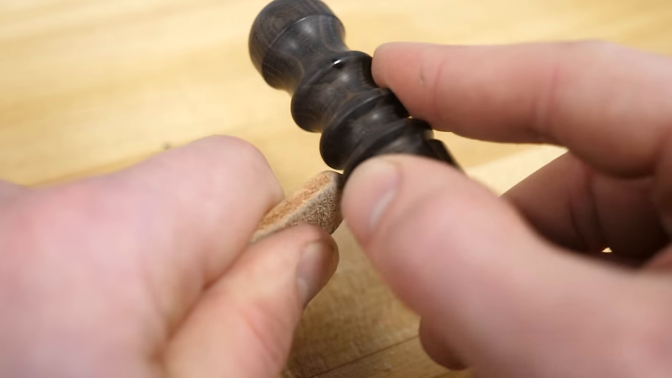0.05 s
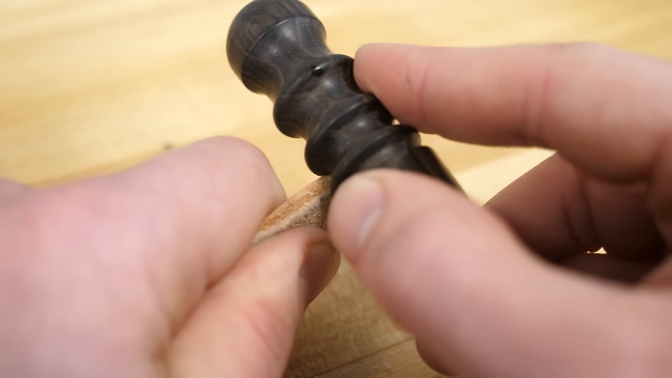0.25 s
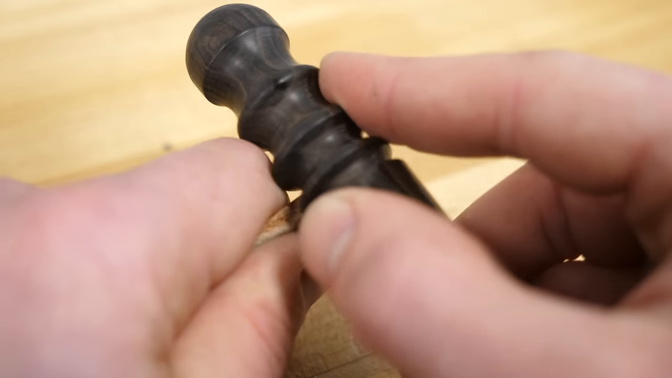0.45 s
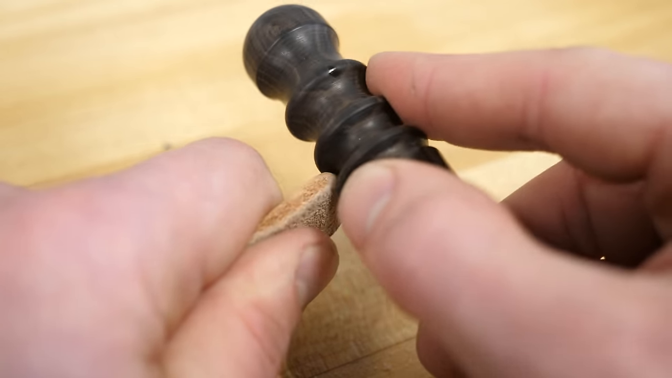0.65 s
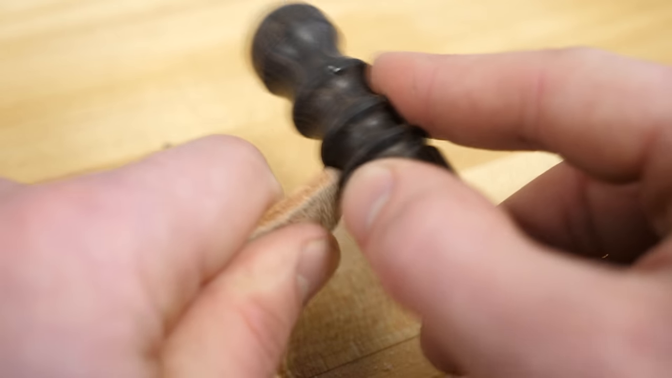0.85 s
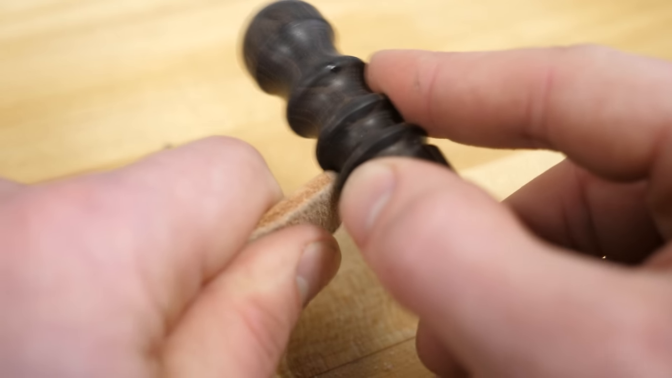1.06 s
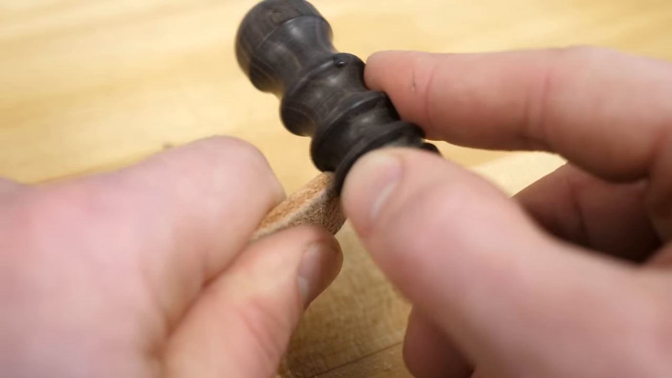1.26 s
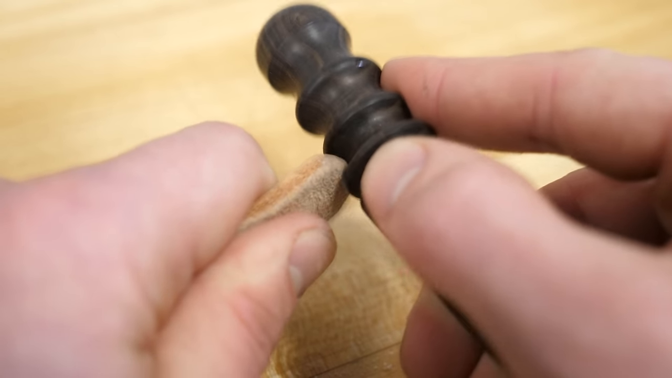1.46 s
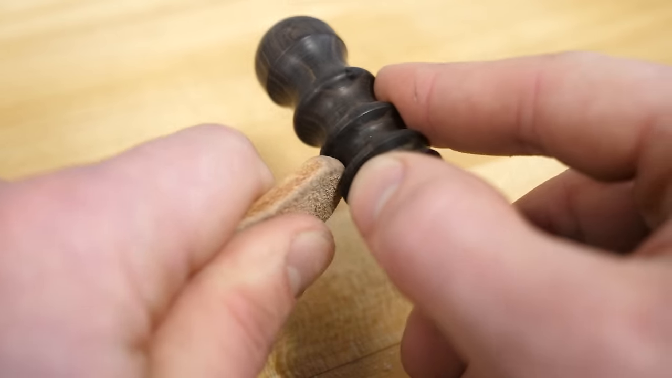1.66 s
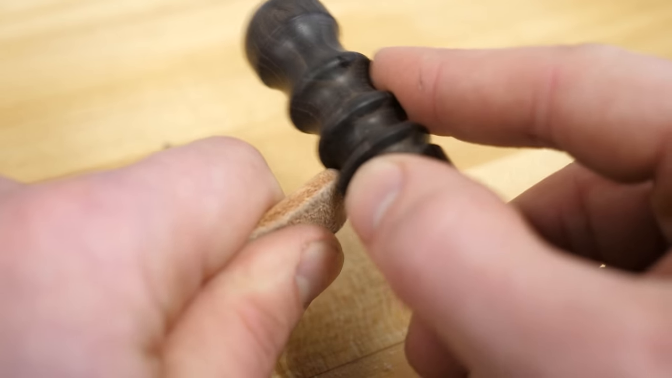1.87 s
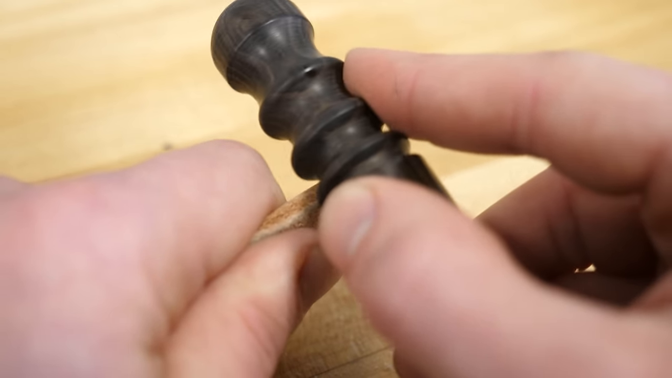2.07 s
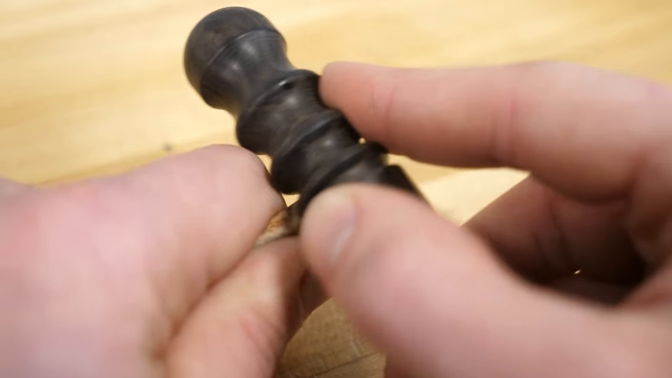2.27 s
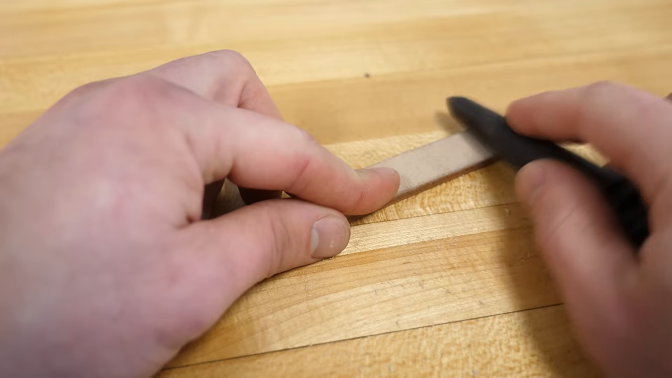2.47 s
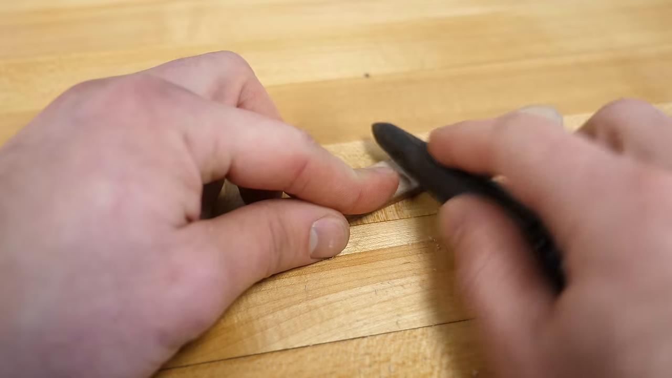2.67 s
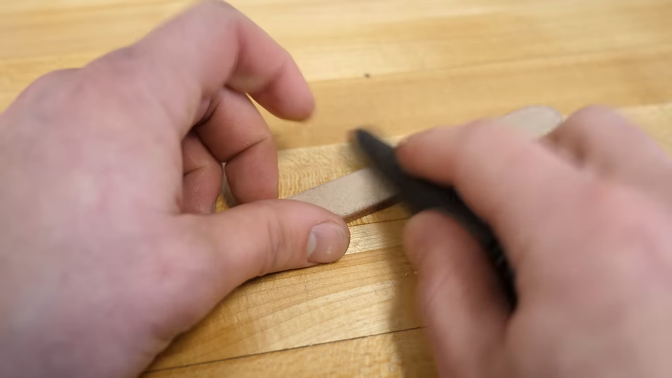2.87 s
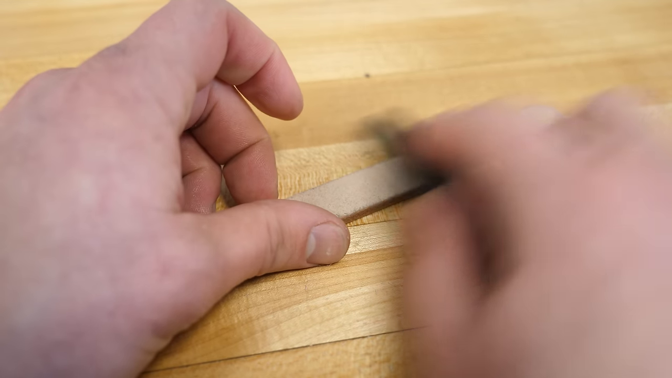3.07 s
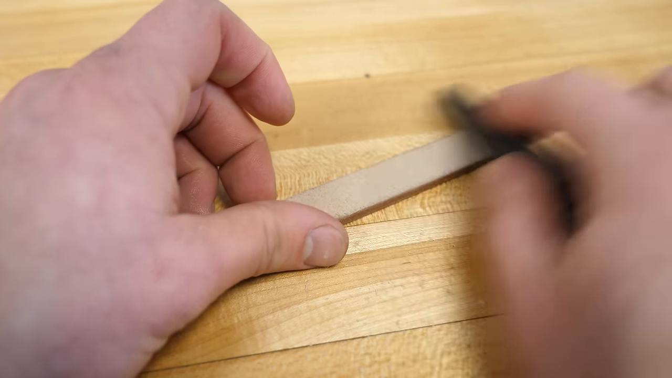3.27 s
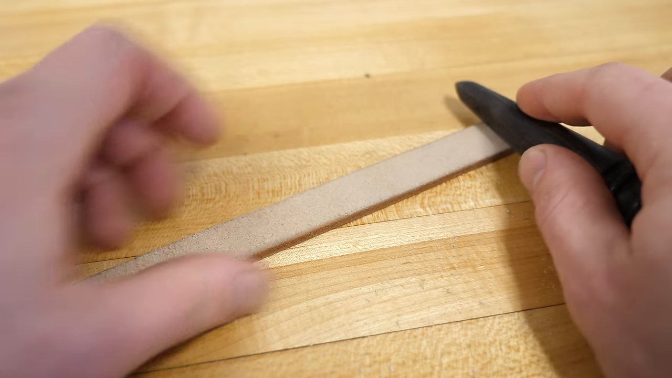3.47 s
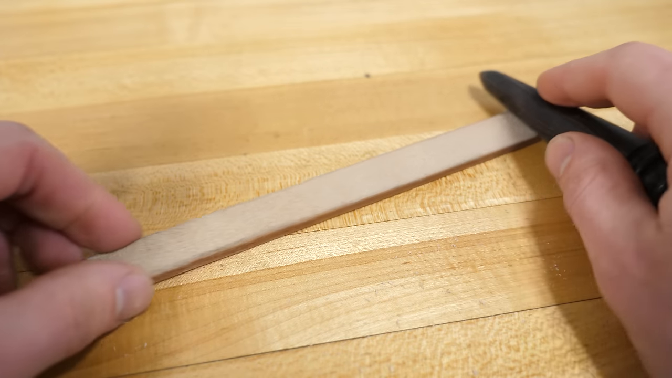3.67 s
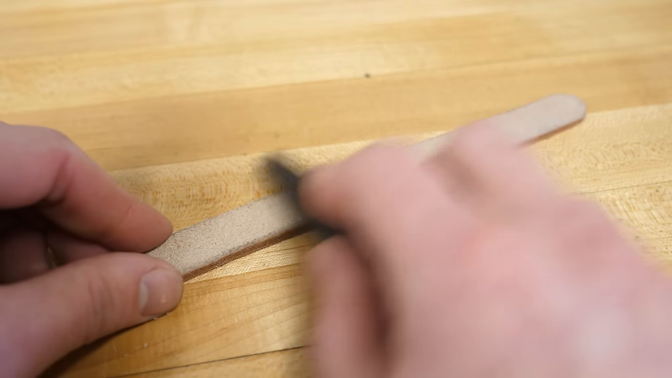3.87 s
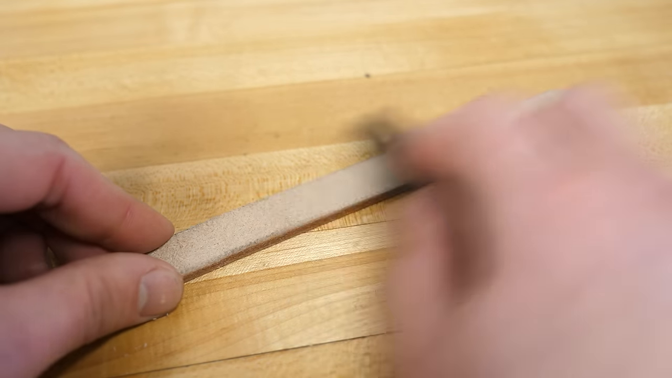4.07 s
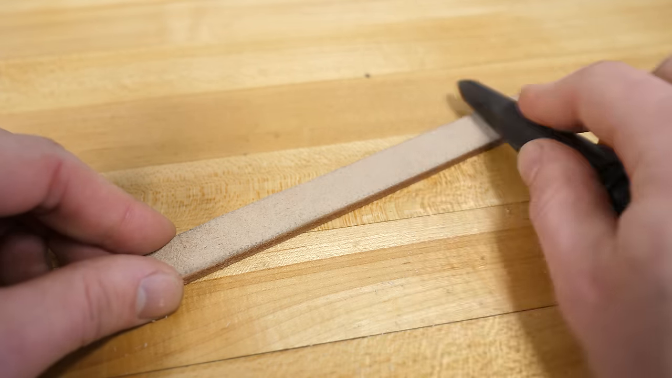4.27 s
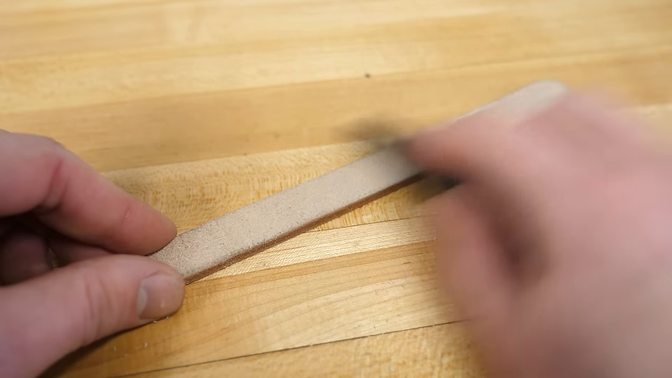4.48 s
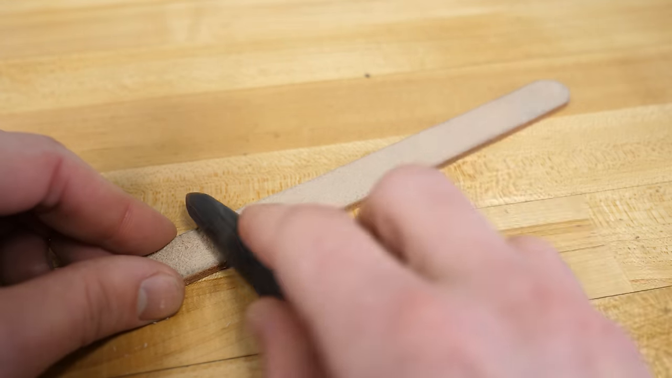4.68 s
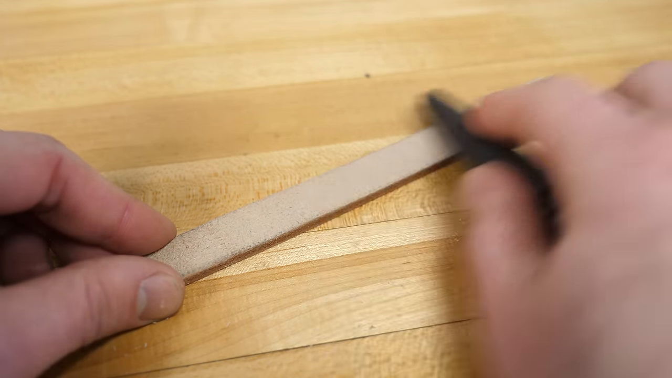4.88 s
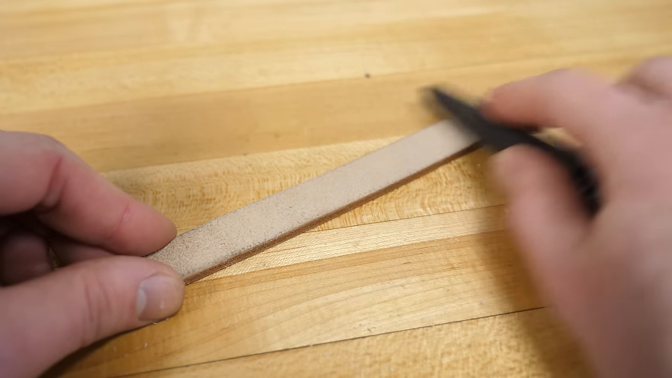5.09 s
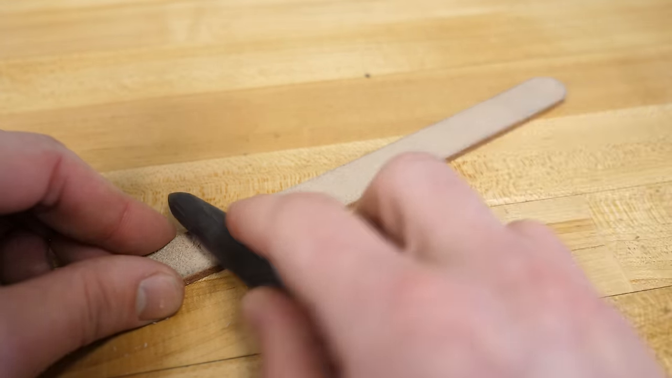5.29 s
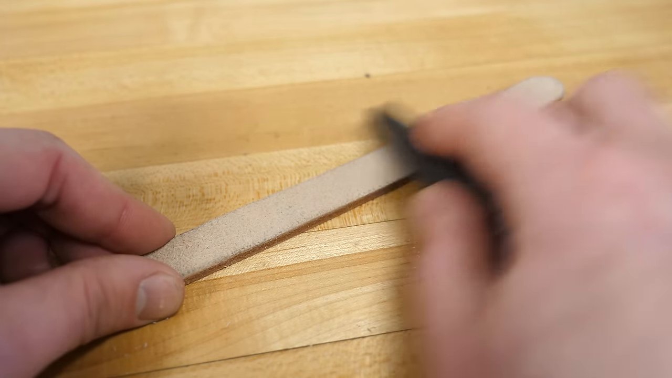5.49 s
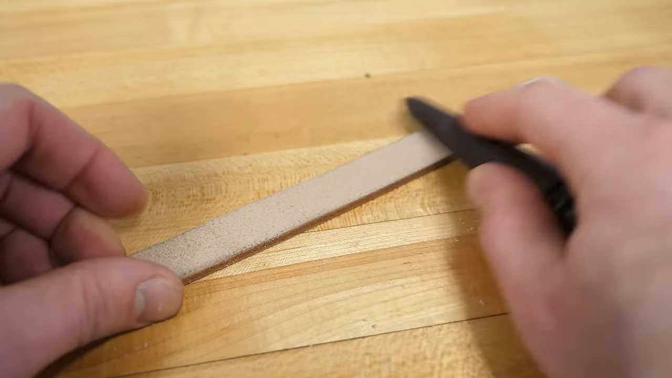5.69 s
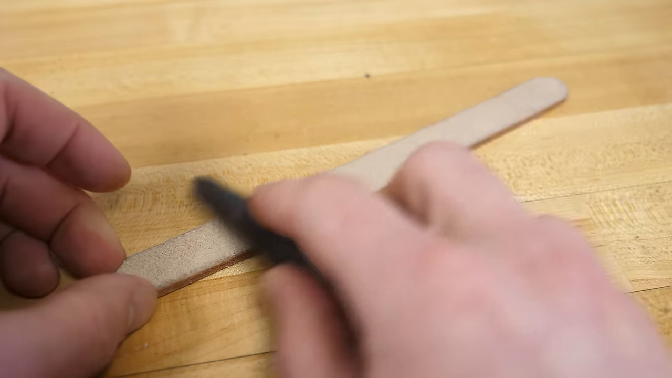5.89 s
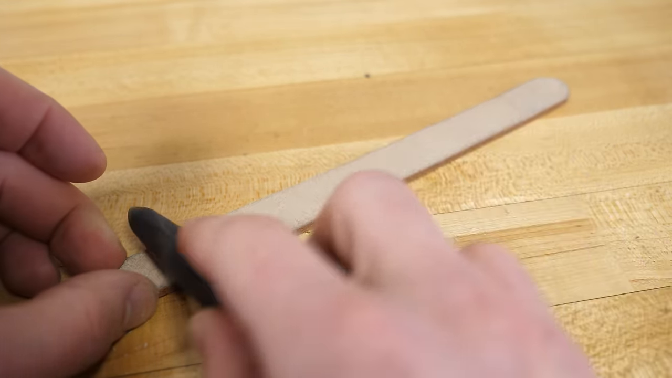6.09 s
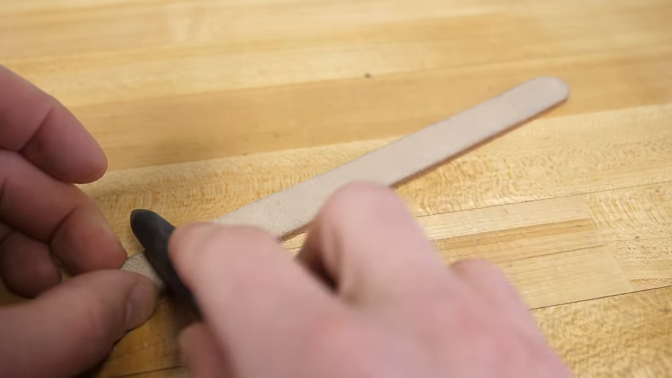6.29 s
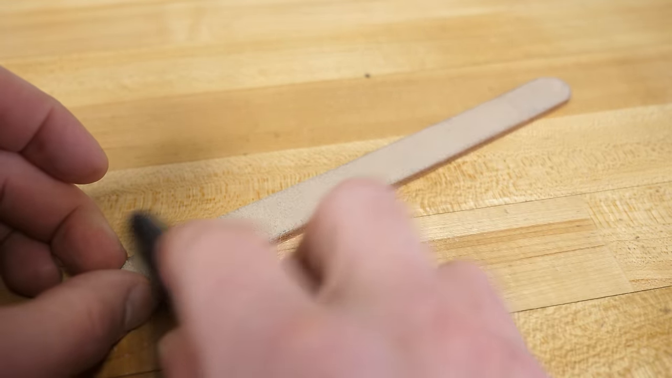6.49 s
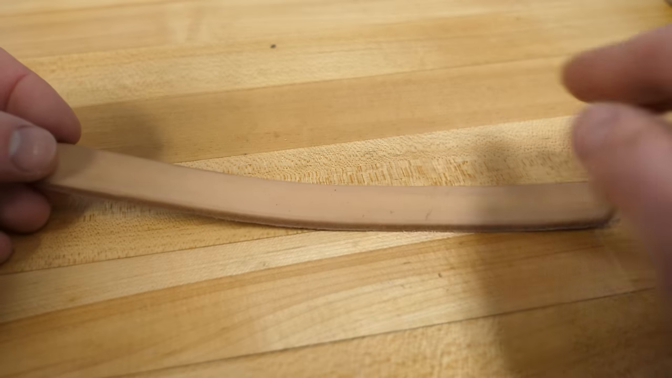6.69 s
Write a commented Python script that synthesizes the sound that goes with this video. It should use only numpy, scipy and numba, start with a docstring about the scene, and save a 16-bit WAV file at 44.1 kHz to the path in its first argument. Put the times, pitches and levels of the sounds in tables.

```python
"""A grooved wooden burnisher is rubbed to and fro on a leather strap, heard close by in a quiet room.
At first the strap's edge is held up in the hand: short bright hisses of noise and resonances.
From 2.37 s the strap lies on a wooden bench, whose boards hum along as resonances of the same friction.
Edge ticks ring the tool, the hands jolt the bench as damped wobbles, fingers slide with coloured noise.
A last tap is chopped at 6.5775 s; a finger slide and the room tone, with its faint hum, remain."""
import sys
import numpy as np
from scipy import signal
from scipy.fft import rfft, irfft, next_fast_len
from scipy.io import wavfile
from scipy.ndimage import uniform_filter1d
from numba import njit

SR = 44100
rng = np.random.default_rng(int(sys.argv[2]) if len(sys.argv) > 2 else 0)


def log_audio(samples):
    """Write samples as a 16-bit WAV file to the path given in sys.argv[1]."""
    # one column per channel
    frames = np.atleast_2d(samples).T
    # limit to full scale, then quantise
    limited = np.clip(frames, -1, 1)
    pcm = np.round(limited * 32767).astype(np.int16)
    wavfile.write(sys.argv[1], SR, pcm)


N = 297215

# strokes, forward and back in turn: start_s, end_s, hiss_db, end_against_start_db,
# middle_over_ends_db, tool_ring_against_hiss_db
STROKES = [(0.056, 0.108, -60, -5, 6, 2.5), (0.135, 0.141, -49.5, 3, 2, 2),
           (0.162, 0.207, -68.5, -3, 0.5, -3), (0.333, 0.358, -60.5, -17, 0, -4.5),
           (0.442, 0.497, -47, 11, 5, -4), (0.616, 0.68, -48.5, -10, 8.5, -1.5),
           (0.75, .81, -45, 8.5, 2, -7), (0.872, 0.938, -43.5, -7.5, 11, -2),
           (0.983, 1.053, -48.5, -3, -2.5, -11), (1.106, 1.152, -53, -9, -2, -8.5),
           (1.223, 1.26, -49, -3, -3.5, -11), (1.333, 1.392, -49, -5, 3.5, -8.5),
           (1.532, 1.592, -50.5, 1.5, -1.5, -7), (1.626, 1.721, -46.5, 2.5, 7, -4.5),
           (1.812, 1.875, -39, 7.5, 16, -10), (1.914, 1.965, -53, -6, 1, -9),
           (2.039, 2.113, -47, -1.5, -0.2, -7), (2.16, 2.202, -48.5, -5, 6, -3),
           (2.259, 2.301, -40.5, 2, 9, -2.5), (2.37, 2.403, -66.5, -1, -3, -8),
           (2.398, 2.514, -60, -0.5, 3.5, -3.5), (2.524, 2.61, -64.5, -4, 0, -13),
           (2.625, 2.719, -53.5, -0.5, 2, -7), (2.739, 2.845, -57, -7.5, 3, -9),
           (2.852, 2.952, -53.5, -3.5, 4, -5), (2.966, 3.059, -58, -2, -0.5, -9.5),
           (3.082, 3.177, -51, -1, 2.5, -3.5), (3.195, 3.297, -55.5, -4, 2, -7.5),
           (3.317, 3.405, -54.5, -7.5, 2.5, -6.5), (3.423, 3.529, -57, -8.5, 4, -4),
           (3.822, 3.965, -48.5, 4.5, 8.5, -4.5), (3.983, 4.084, -47.5, 6.5, 3.5, -15),
           (4.1, 4.211, -44, 10.5, 6, -7), (4.227, 4.339, -42, 1.5, 3.5, -8),
           (4.36, 4.476, -42.5, 3.5, 4.5, -6.5), (4.491, 4.618, -46, 2.5, 5.5, -5),
           (4.641, 4.762, -41.5, -2, 6.5, 1), (4.773, 4.902, -47, -2.5, 2.5, -6.5),
           (4.927, 5.049, -43.5, 1.5, 5.5, -3.5), (5.062, 5.2, -45, 1.5, 9.5, -5.5),
           (5.226, 5.349, -43.5, -0.5, 4.5, -3.5), (5.362, 5.485, -47.5, 4, 5, -4.5),
           (5.513, 5.638, -48, 2, 5.5, -0.1), (5.647, 5.78, -55.5, -2.5, 4.5, -3),
           (5.801, 5.917, -57, 1.5, 2.5, 0), (5.935, 6.037, -59.5, -6, 3.5, -7.5),
           (6.054, 6.144, -57, 3, 1, -9), (6.163, 6.259, -53.5, -5.5, 6, -11.5),
           (6.271, 6.357, -56, 6, 2.5, -7.5), (6.375, 6.471, -53.5, 0, 6, -3),
           (6.492, 6.614, -55.5, 1, 5.5, -6)]
# resonant bodies: strap held in the hand, strap laid on the bench.
# strap, low, high, upper: centre_hz, width_hz, level_db (relative within each set)
# hiss (broad fibre hiss), fine (finest fibres): corner_hz, density_db_per_hz
# upper_db: gain of the upper set; peak_share: width of the hiss peak as a share of its centre;
# peak_db: its part of the hiss; fall_s: release; swell: exponent of the speed curve;
# scrape_drift: wander of the low set; shake_db: gain of the bench shudder
HELD = dict(strap=[(173, 22, -13), (319, 77, 3), (640, 210, -4.5), (1110, 300, 13)], low=[(1680, 300, 3.5),
        (1950, 400, -3)], high=[(3440, 340, -1.5), (4150, 770, -24)], upper=[(8370, 1960, 0)],
        upper_db=4.5, hiss=[(3000, -33), (4500, 7), (6200, 12.5), (9000, 13.5), (9900, 2.5), (12000, -62),
        (12500, -29)], fine=[(10000, 7), (10500, 5), (12100, 5.5), (12400, -7), (15500, -11)],
        peak_share=0.15, peak_db=-1.5, fall_s=0.0038, swell=0.33, scrape_drift=0.088, shake_db=-55)
LAID = dict(strap=[(187.3, 25, 2.5), (260, 54, 6.5), (404.2, 19.2, -0.5), (484, 44, 2), (559.2, 15, -0.5),
        (605, 66, -5.5), (690, 33, -7), (734, 42, -3), (873, 194, 3)], low=[(1401, 54, -7), (1033, 166, 2),
        (2060, 6900, -1)], high=[(3444, 330, 18), (3100, 740, 4.5)], upper=[(6200, 750, 0.5),
        (7370, 550, -4), (9100, 2100, 2.5)], upper_db=4.5, hiss=[(600, -7.5), (2200, -16.5), (4500, -9.5),
        (5500, -7.5), (6100, -8), (8000, -9.5), (10500, -18), (11500, -78)], fine=[(9800, -6.5),
        (10800, -10), (12200, -6.5), (12600, -6), (14000, -6), (15500, -9.5)],
        peak_share=0.18, peak_db=-1.5, fall_s=0.012, swell=1.24, scrape_drift=0.011, shake_db=-36.5)
# drifting grip and place of contact: time_s, bench_forward_hz, bench_back_hz, bench_forward_db,
# bench_back_db, hiss_peak_hz, scrape_hz, scrape_db, finest_fibres_db (levels against the hiss)
HELD_CONTACT = [(0.1, 398, 430, -8, -33, 7760, 1990, -6.5, -20),
                (0.47, 410, 430, -20, -44, 7960, 1770, -6.5, -13.5),
                (0.78, 240, 310, -20, -40, 7870, 2070, 1, -15.5),
                (1.0, 403, 490, -10.5, -44, 7540, 1730, -4, -18),
                (1.3, 460, 360, -17, -53, 8000, 1570, -2.5, -18.5),
                (1.56, 445, 390, -14.5, -52, 6960, 1830, -13.5, -17.5),
                (1.68, 420, 420, -52, -52, 7900, 1290, -3, -12.5),
                (1.94, 417, 390, 9.5, -42, 7100, 1510, -8.5, -24),
                (2.08, 455, 400, -10, -30, 7800, 1570, -3, -19),
                (2.18, 400, 440, -15, -26, 7700, 1700, -4, -23),
                (2.28, 278, 490, -9, -28, 8000, 1610, -5, -14)]
LAID_CONTACT = [(2.4, 430, 408, -10, -3, 9340, 1820, 1, -0.5),
                (2.7, 313, 412, -3, -4, 10100, 2070, -3.5, -7), (2.9, 396, 390, 2, 1.5, 8700, 1930, -4, -5),
                (3.3, 288, 407, 2.5, 1, 8350, 1900, -5.5, -5.5),
                (3.48, 390, 780, -13, 0.5, 8000, 1430, -6, -2),
                (3.85, 405, 350, -1.5, -5, 8500, 1810, -25, -7.5),
                (4.15, 343, 420, 4, -1, 7200, 1570, -5, -11.5),
                (4.45, 440, 420, 4, 9.5, 7230, 1780, -5, -6.5), (4.7, 600, 523, 9, 7, 7060, 1470, -7, -7),
                (5.2, 510, 446, 8, 8.5, 7300, 1520, -10.5, -6.5),
                (5.57, 600, 426, 12, 6.5, 6660, 1410, -5.5, -6.5),
                (5.85, 380, 450, 12.5, 5.5, 7240, 1520, -0.5, -5.5),
                (6.1, 377, 390, 8.5, -7, 7600, 1530, -10.5, -7.5),
                (6.32, 296, 483, 5.5, 6, 7450, 1540, -3, -6.5), (6.43, 290, 520, 5, 2, 7150, 1500, 2.5, -6),
                (6.55, 274, 523, 14.5, -6, 6370, 1800, 1, -5)]
# rules of a stroke, as (forward, back): onset_ms; squeak_db against the ring;
# ring, fine, bench, hiss lean_db: end against start; peak_glide, bench_glide: share of the centre.
# squeak_hz: (start_hz, end_hz), squeak_width in Hz, squeak_growth: extra dB per dB of ring;
# back: what a back stroke adds to the last four contact columns;
# scrape_follows_ring: dB of scrape per dB of ring
HELD_STROKE = dict(onset_ms=(4, 10), ring_lean_db=(1.5, -4), squeak_db=(-16, -10), squeak_hz=(4100, 2520),
               squeak_width=940, squeak_growth=0.97, fine_lean_db=(-1, 20), bench_lean_db=(-0.5, -3),
               hiss_lean_db=(-10.5, 13.5), peak_glide=(-0.043, 0.033), bench_glide=(-0.054, 0.059),
               back=(609, 55, 0.7, 0.5), scrape_follows_ring=1)
LAID_STROKE = dict(onset_ms=(8.7, 11.2), ring_lean_db=(-4.5, 7), squeak_db=(-24, -1),
               squeak_hz=(3370, 3550), squeak_width=84, squeak_growth=0.15, fine_lean_db=(-7, 17),
               bench_lean_db=(-0.5, 4.5), hiss_lean_db=(8, 3.5), peak_glide=(-0.21, 0.12),
               bench_glide=(-0.079, 0.11), back=(42, 20, 4.5, -4), scrape_follows_ring=0.16)
BENCH_FROM_S = 2.37


def rubbing():
    """Sliding friction: alternate strokes excite the held strap first, the laid strap later."""
    rows = np.array(STROKES)
    held = rows[:, 0] < BENCH_FROM_S
    back = np.arange(len(rows)) % 2
    in_hand = rub(rows[held], back[held], HELD, HELD_STROKE, HELD_CONTACT)
    on_bench = rub(rows[~held], back[~held], LAID, LAID_STROKE, LAID_CONTACT)
    return in_hand + on_bench


def rub(rows, back, body, stroke, contact):
    """Source and filter: friction noise, shaped by each stroke, drives the resonances of the body."""
    middle = rows[:, :2].mean(axis=1)
    contact_s, *curves = np.transpose(contact)
    touch = np.array([np.interp(middle, contact_s, curve) for curve in curves])
    bench_hz = np.where(back, touch[1], touch[0])
    bench_db = np.where(back, touch[3], touch[2])
    peak_hz, scrape_hz, scrape_db, fine_db = touch[4:] + np.outer(stroke["back"], back)
    scrape_db = scrape_db + stroke["scrape_follows_ring"] * rows[:, -1]
    shares_db = np.transpose([bench_db, scrape_db, fine_db])
    force, speed, along, shares = stroke_motion(rows, back, body, stroke, shares_db)
    broad, peak_glide, bench_glide, gains = shares

    now = np.arange(N) / SR
    peak_hz = np.interp(now, middle, peak_hz) * peak_glide
    scrape_hz = np.interp(now, middle, scrape_hz) * bench_glide
    bench_hz = np.interp(now, middle, bench_hz) * bench_glide
    strap, low, fine, high, squeak = gains * force
    grip = walk(180)
    out = fibre_hiss(force, broad, fine, peak_hz, grip, body)
    out = out + tool_ring(high, squeak, along, grip, body, stroke)
    out = out + strap_and_bench(strap * speed, low * speed, bench_hz, scrape_hz, grip, body)
    return out + bench_shudder(force, body)


def stroke_motion(rows, back, body, stroke, shares_db):
    """Kinematics of friction: force arches over each stroke while speed is greatest halfway."""
    force, speed, along = np.zeros(N), np.zeros(N), np.zeros(N)
    broad, peak_glide, bench_glide = np.ones(N), np.ones(N), np.ones(N)
    gains = np.zeros((5, N))  # strap, low, fine, high, squeak
    for row, way, share_db in zip(rows, back, shares_db):
        start, end, db, lean_db, arch_db, ring_db = row
        rise, fall = stroke["onset_ms"][way] / 1000, body["fall_s"]
        at = slice(int((start - rise) * SR), int((end + fall) * SR))
        t = np.arange(at.start, at.stop) / SR
        edges = np.minimum((t - t[0]) / rise / 2.36, (t[-1] - t) / fall / 2)
        edges = np.clip(edges, 0, 1) ** 2.53
        part = (t - start) / (end - start)
        ends_db = db - arch_db
        arch = [ends_db - lean_db / 2, db, ends_db + lean_db / 2]
        force[at] = edges * undb(np.interp(part, [1 / 6, 3 / 6, 5 / 6], arch))
        half_turn = np.pi * (t - t[0]) / (t[-1] - t[0])
        speed[at] = np.sqrt(2) * np.abs(np.sin(half_turn)) ** body["swell"]

        along[at] = np.clip(part, 0, 1)
        off_middle = along[at] - 0.5
        peak_glide[at] = 1 + stroke["peak_glide"][way] * off_middle
        bench_glide[at] = 1 + stroke["bench_glide"][way] * off_middle
        broad[at] = undb(stroke["hiss_lean_db"][way] * off_middle)
        squeak_db = stroke["squeak_db"][way] + (1 + stroke["squeak_growth"]) * ring_db
        gains[:, at] = undb([*share_db, ring_db, squeak_db])[:, None]
        gains[0, at] *= undb(stroke["bench_lean_db"][way] * off_middle)
        gains[2, at] *= undb(stroke["fine_lean_db"][way] * off_middle)
        gains[3:, at] *= undb(stroke["ring_lean_db"][way] * off_middle)
    return force, speed, along, (broad, peak_glide, bench_glide, gains)


def fibre_hiss(force, broad, fine, peak_hz, grip, body):
    """Broadband friction noise: a wandering peak wakes the upper resonances above a coloured hiss."""
    bite_hz = peak_hz * (1 + 0.015 * walk(21))
    bite = favour(force * grit(grip), bite_hz, body["peak_share"])
    peak = undb(body["peak_db"] + body["upper_db"]) * ring(bite, body["upper"], drift=0.0088)
    hiss_share = np.sqrt(1 - undb(2 * body["peak_db"]))  # the power the peak leaves over
    hiss = hiss_share * force * broad * colour(grit(grip), body["hiss"])
    return peak + hiss + fine * colour(grit(grip), body["fine"])


# a looser grip lets a broad band sound around the tool's ring: time_s, centre_hz, against_ring_db
RING_SPREAD = [(0.47, 3460, -10), (0.65, 4000, -3.5), (0.78, 3560, -14), (0.9, 4040, -3.5),
               (1.02, 3500, -15), (2.3, 3560, -10), (3.13, 3270, 0), (3.4, 2830, -4.5), (4.5, 2860, -36),
               (6.1, 2800, 1.5), (6.32, 2900, 6), (6.43, 2030, -1.5), (6.53, 3020, 7.5)]


def tool_ring(high, squeak, along, grip, body, stroke):
    """Forced resonance: friction noise rings the tool in fixed, broad and gliding squeak bands."""
    spread_s, *spread = np.transpose(RING_SPREAD)
    spread_hz, spread_db = (np.interp(np.arange(N) / SR, spread_s, curve) for curve in spread)
    flicker = undb(1.47 * walk(25.02))
    out = ring(high * flicker * grit(grip), body["high"], drift=0.004)
    out = out + steep(high * undb(spread_db) * grit(grip), spread_hz, 1330)
    squeak_hz = np.interp(along, [0, 1], stroke["squeak_hz"])
    return out + steep(squeak * grit(grip), squeak_hz, stroke["squeak_width"])


def strap_and_bench(strap, low, bench_hz, scrape_hz, grip, body):
    """Modal selection: the place of contact favours the modes near one pitch; speed drives them."""
    scrape = low * undb(3.9 * walk(18)) * grit(grip)
    scrape = favour(scrape, scrape_hz, 0.23)
    push = favour(favour(strap * grit(grip), bench_hz, 0.85), bench_hz, 0.85)
    return ring(scrape, body["low"], drift=body["scrape_drift"]) + ring(push, body["strap"], drift=0.015)


# shudder of the bench: centre_hz, width_hz, level_db (relative)
SHAKE = [(31.2, 24, -7), (115, 98, 1.5)]


def bench_shudder(force, body):
    """Compressive response: low modes follow a power of the force and grow slower than the hiss."""
    return undb(body["shake_db"]) * ring(force ** 0.56 * grit(walk(21)), SHAKE)


# the tool ticks on an edge: time_s, relative_level_db, thump_share_db, push_ms
TICKS = [(0.548, -67, 7, 2.0), (0.851, -49, -2, 2), (0.985, -48, 8.5, 1.65), (1.856, -35, 0, 0.44),
         (2.041, -46, 21.5, 1.74), (3.454, -32, 7, 0.45), (3.459, -45, 16, 0.3), (6.5711, -15, -2, 2.54)]


def ticks():
    """Impulse response: a crack rings the tool; the push behind it thumps the wood, duller when longer."""
    crack, below, t = np.zeros(N), np.zeros(N), np.arange(400) / SR
    for s, db, bench_db, push_ms in TICKS:
        at = slice(int(s * SR), int(s * SR) + 400)
        crackle = 0.17 * rng.standard_normal(400) * np.exp(-t / 0.0023)
        crack[at] += undb(db) * (2 * np.exp(-t / 0.00006) + crackle)
        push = np.sin(np.pi * np.clip(1000 * t / push_ms, 0, 1))
        below[at] -= undb(db + bench_db) * push
    # modes: centre_hz, width_hz, level_db (relative)
    tool = ring(crack, [(1580, 230, 2.0), (2670, 840, -0.5), (5300, 4000, -1.0)])
    wood = ring(below, [(129, 53, -5.0), (314, 630, -4.0), (640, 360, -0.5),
                        (880, 120, 4.5), (1120, 81, 1.0), (1590, 380, 8.5)])
    return undb(-13) * tool + undb(-15.5) * wood


# jolts of the hands through the bench: time_s, level_db, pitch_hz (settles here after the sag)
JOLTS = [(0.132, -53.5, 86), (0.441, -54.5, 106), (0.495, -43, 109), (0.751, -49.5, 93.5),
         (0.809, -40.5, 163), (0.984, -54.5, 328), (0.987, -58.5, 129.7), (1.222, -57, 93),
         (1.553, -55, 125), (1.565, -42, 28.8), (1.603, -56.5, 116.6), (1.835, -54.5, 119.4),
         (1.863, -52, 131), (2.042, -38.5, 93), (2.262, -44, 92), (2.294, -39, 81.4), (3.996, -57, 100),
         (4.108, -43, 37.7), (4.238, -41, 121), (4.271, -49, 115), (4.368, -42, 37.7), (4.499, -51, 56),
         (4.649, -50, 32.5), (4.771, -54, 100), (4.949, -44, 26.9), (5.067, -46, 83), (6.077, -53, 26.6),
         (6.177, -32, 44.2), (6.387, -48, 42.3), (6.106, -52.5, 125), (0.985, -59, 632),
         (3.125, -50.5, 229)]
# the bench frame rings on: pitch_hz, level_db (against the jolt, at most), t60_s
LEGS = [(80.8, -16.5, 0.34), (124.6, -9, 0.26), (252.5, -14.5, 0.3)]
JOLT_T60_S, JOLT_T60_PER_DB = 0.15, -0.0775  # at -50 dB and 100 Hz; exponent per dB above -50


def jolts():
    """Damped oscillation: pushes sag in pitch, hard and high ones die quicker, quick ones ring the frame."""
    out, t = np.zeros(N + SR // 2), np.arange(SR // 2) / SR
    for s, db, hz in JOLTS:
        t60 = JOLT_T60_S * np.exp(JOLT_T60_PER_DB * (db + 50.0)) * (100 / hz) ** 0.38
        sagging = t + 0.0004 * (1 - np.exp(-t / 0.012))
        wave = np.sin(2 * np.pi * hz * sagging) * 1000.0 ** (-t / t60)
        for leg_hz, leg_db, leg_t60 in LEGS:
            leg_gain = undb(leg_db) * min(hz / leg_hz, 1) ** 2
            wave = wave + leg_gain * np.sin(2 * np.pi * leg_hz * t) * 1000.0 ** (-t / leg_t60)
        onset = np.sin(np.pi / 2 * np.minimum(t * hz / 0.41, 1)) ** 2
        out[int(s * SR):][:len(t)] -= undb(db) * wave * onset
    return out[:N]


# fingers slide over the leather, one list per slide: time_s, level_db, finest_fibres_against_it_db
SLIDES = [
    [(3.53, -68.5, -8), (3.56, -69, -14), (3.63, -68.5, -8), (3.68, -74.5, -6), (3.77, -68.5, -15),
     (3.84, -67.5, 6)],
    [(6.58, -68.5, -7), (6.67, -68, -5), (6.74, -71, -5)],
]
# spectrum of skin on leather: corner_hz, density_db_per_hz
SLIDE_COLOUR = [(100, -2), (400, -1), (3100, -6.5), (3450, -0.5), (3900, -6.5), (7500, -4), (10300, -10),
                (11200, -19)]


def slides():
    """Light friction: skin on leather hisses as coloured noise with its own share of finest fibres."""
    body, fine, now = 0, 0, np.arange(N) / SR
    for s, db, fine_db in map(np.transpose, SLIDES):
        body = body + undb(np.interp(now, s, db, -150, -150))
        fine = fine + undb(np.interp(now, s, db + fine_db, -150, -150))
    grip = walk(47)
    return body * colour(grit(grip), SLIDE_COLOUR) + fine * colour(grit(grip), LAID["fine"])


def wall_echo(near):
    """Diffuse reverberation: delayed, decaying noise as impulse response; walls swallow the treble."""
    t60_s, delay_s, level_db, dull_hz = 0.1, 0.00592, -14, 4630
    t = np.arange(SR // 3) / SR
    walls = rng.standard_normal(len(t)) * 1000.0 ** (-t / t60_s) * (t > delay_s)
    walls = signal.lfilter(*signal.butter(1, dull_hz, fs=SR), walls)
    walls = walls / np.sqrt(np.sum(walls ** 2))
    return undb(level_db) * signal.fftconvolve(near, walls)[:N]


# spectrum of the room tone: corner_hz, density_db_per_hz
ROOM_TONE = [(20, 11.5), (250, -12.5), (450, -10.5), (560, -16), (1500, -19), (12600, -32.5), (12900, -62)]
ROOM_DB, HUM_DB, HUM_HZ = -73.5, -89, 479  # middle levels, hum pitch


def room_tone():
    """Stationary background: air and far machinery as coloured noise, with one faint wavering hum."""
    tone = np.sqrt(2) * np.sin(2 * np.pi * HUM_HZ * np.arange(N) / SR)
    hum = undb(HUM_DB + 2 * walk(8.6)) * tone
    return undb(ROOM_DB + walk(0.66)) * colour(rng.standard_normal(N), ROOM_TONE) + hum


def grit(shared, catch_db=2.2, patchy_db=1.7):
    """Irregular friction: fibres catch and let go, as noise with a shared grip and patches of its own."""
    gain = undb(catch_db * shared + patchy_db * walk(40))
    return rng.standard_normal(N) * gain / np.sqrt(np.mean(gain ** 2))


def walk(rate):
    """Slow random modulation: levels held 1 / rate s and slewed twice; spread near 1."""
    k = int(SR / rate)
    steps = np.repeat(rng.standard_normal(N // k + 1), k)
    return 1.01 * uniform_filter1d(uniform_filter1d(steps, k), k)[:N]


def ring(x, modes, drift=0):
    """Modal superposition: resonances of alternating sign; drift lets the centre of each wander."""
    out = 0
    for k, (hz, width, db) in enumerate(modes):
        centre = hz * (1 + drift * walk(15))
        out = out + (-1) ** k * undb(db) * steep(x, centre, width)
    return out / np.sqrt(sum(undb(2 * db) for _, _, db in modes))


def steep(x, hz, width):
    """Cascaded resonance: a band-pass applied twice so that its flanks stay dark."""
    each = np.full(N, 1.66 * width)  # two passes narrow the band
    return svf(svf(x, hz, each), hz, each) * np.sqrt(2 * np.pi * width / SR)


def favour(x, hz, share):
    """Constant relative bandwidth: a band with gain 1 at its moving centre, width a share of it."""
    width = share * hz
    return svf(x, hz, width) * np.sqrt(np.pi * width / SR)


@njit
def svf(x, hz, width):
    """State-variable band-pass with a movable centre; unit noise comes out near unit level."""
    y, band, low = np.empty(len(x)), 0., 0.
    for i in range(len(x)):
        g, k = np.tan(np.pi * hz[i] / SR), width[i] / hz[i]
        v = (band + g * (x[i] + 1e-18 - low)) / (1 + g * (g + k))
        band, low, y[i] = 2 * v - band, low + 2 * g * v, k * v
    return y * np.sqrt(SR / (np.pi * width))


def colour(x, points):
    """Spectral shaping: gives unit noise the spectrum of the points, at unit level."""
    size = next_fast_len(N)
    hz, db = np.transpose(points)
    log_hz = np.log(np.fft.rfftfreq(size, 1 / SR) + 1)
    gain = undb(np.interp(log_hz, np.log(hz), db, -80, -80))
    return irfft(rfft(x, size) * gain / np.sqrt(np.mean(gain ** 2)), size)[:N]


def undb(db):
    """Logarithmic level: decibels to an amplitude factor."""
    return 10 ** (np.asarray(db) / 20)


NEAR_STOPS_S = 6.5775


def scene():
    """Superposition: rubbing, ticks, their echo and the jolts stop together; slides and room go on."""
    near = rubbing() + ticks()
    near = near + wall_echo(near) + jolts()
    near = near * (np.arange(N) < NEAR_STOPS_S * SR)  # chops the last tap
    return (near + slides() + room_tone())[None]


def record(dry):
    """Band limitation: an elliptic low-pass cuts the top steeply above 15730 Hz."""
    return signal.sosfilt(signal.ellip(10, 0.2, 70, 15730, fs=SR, output="sos"), dry)


dry = scene()
out = record(dry)
log_audio(out)
```